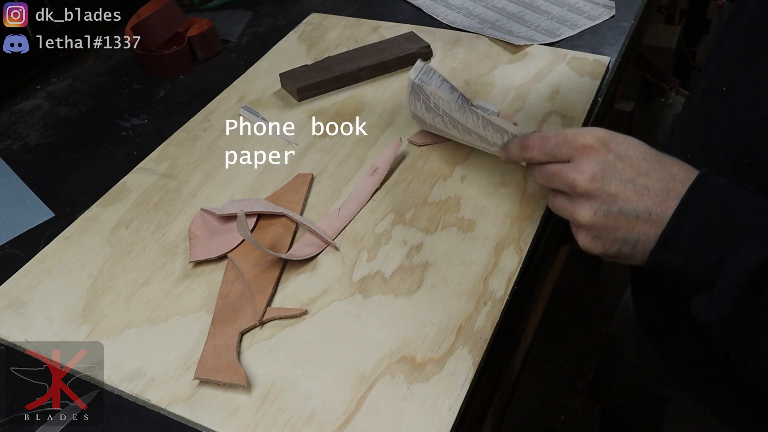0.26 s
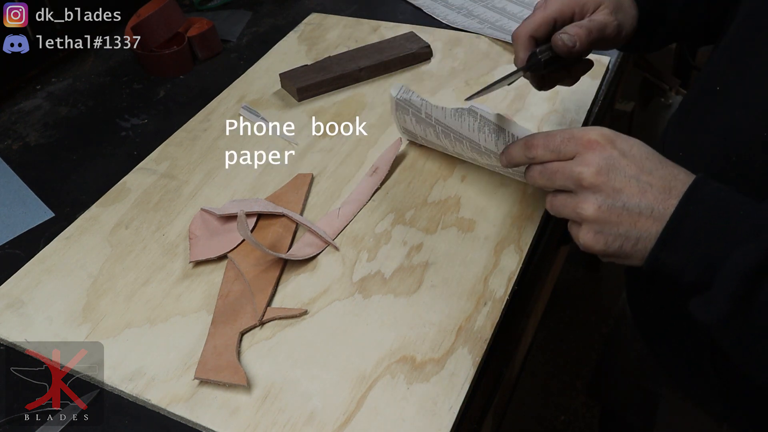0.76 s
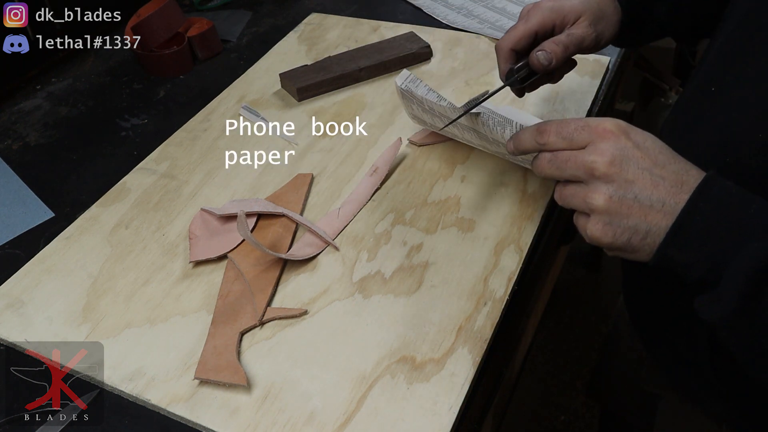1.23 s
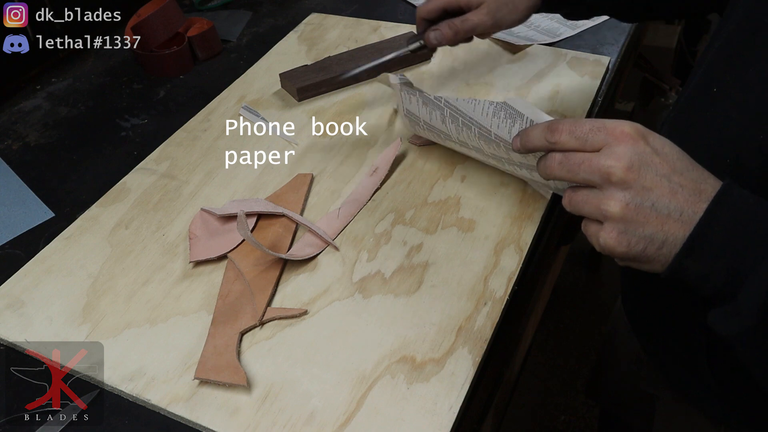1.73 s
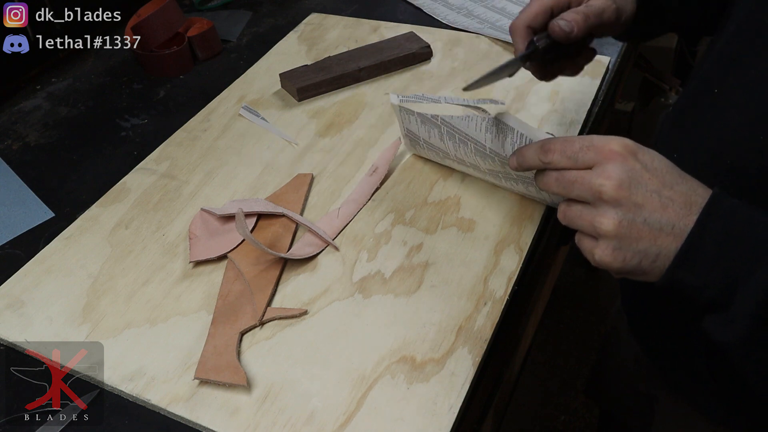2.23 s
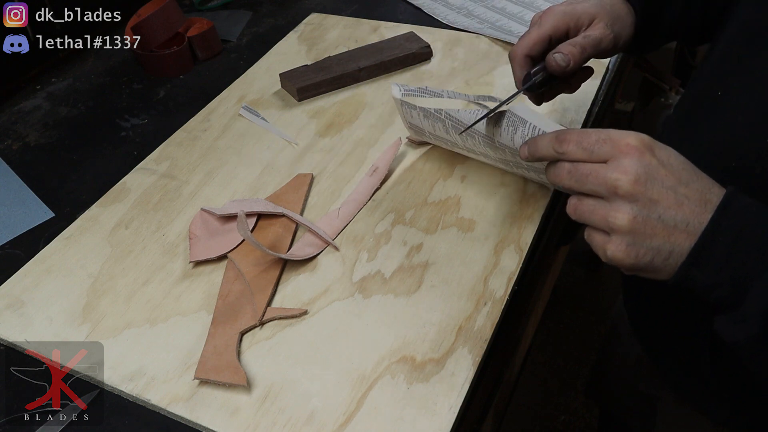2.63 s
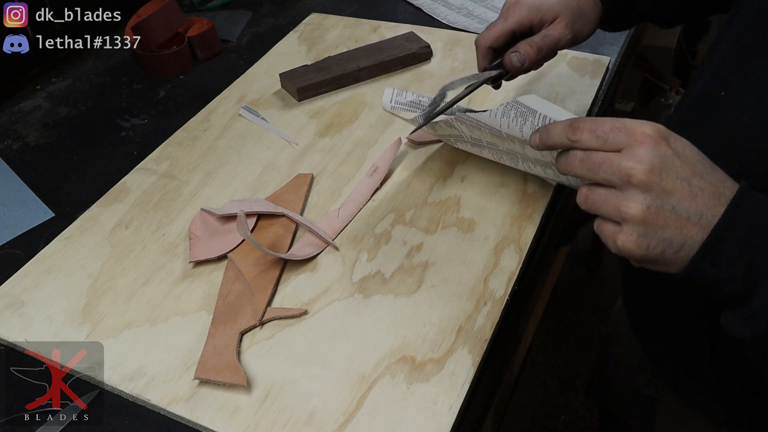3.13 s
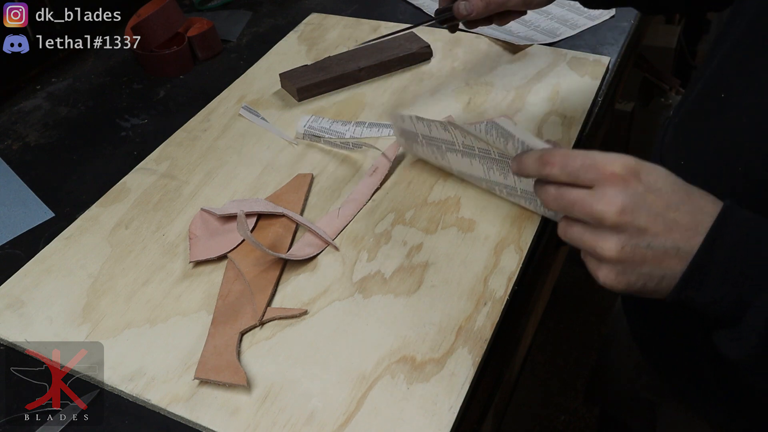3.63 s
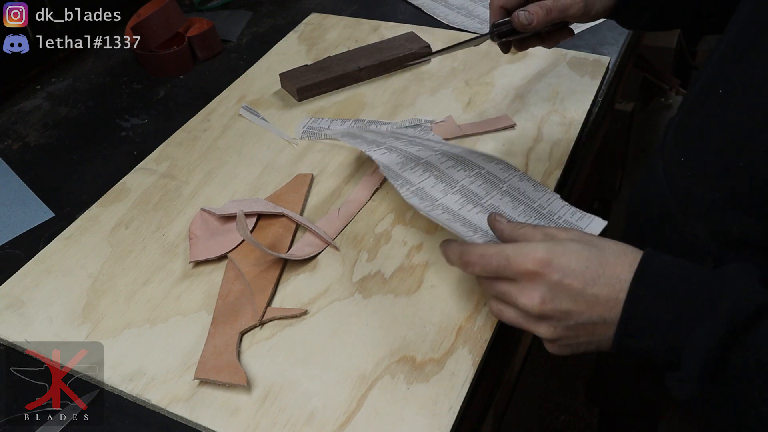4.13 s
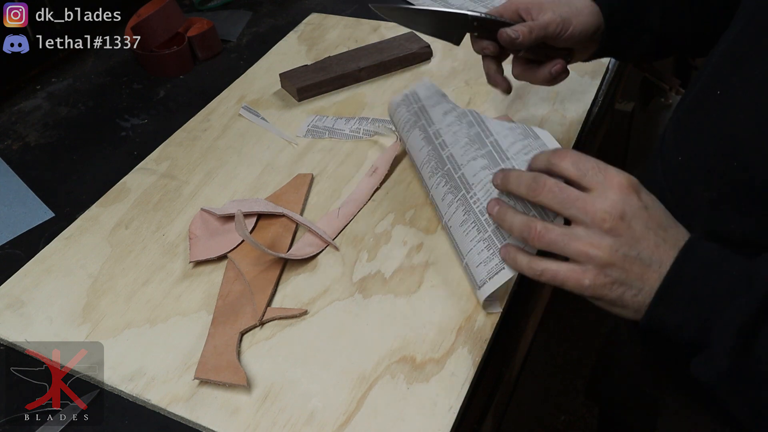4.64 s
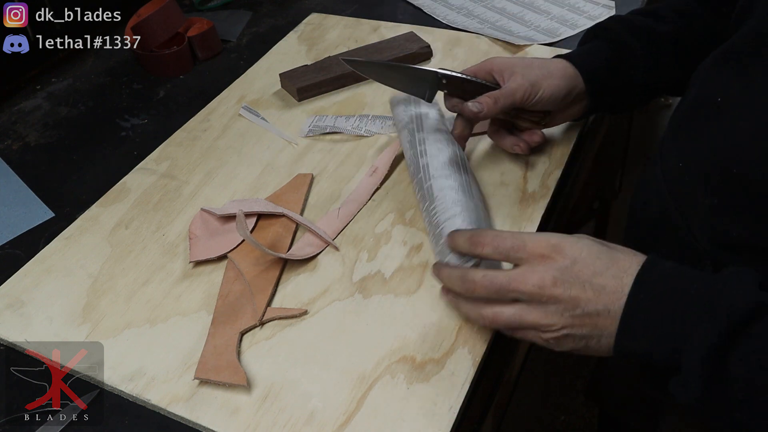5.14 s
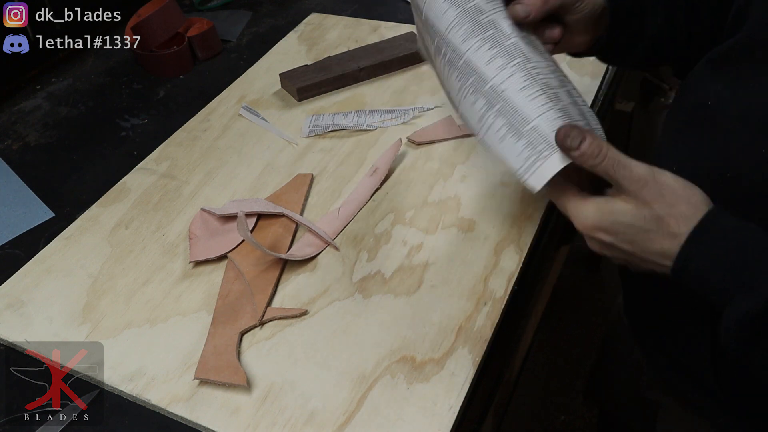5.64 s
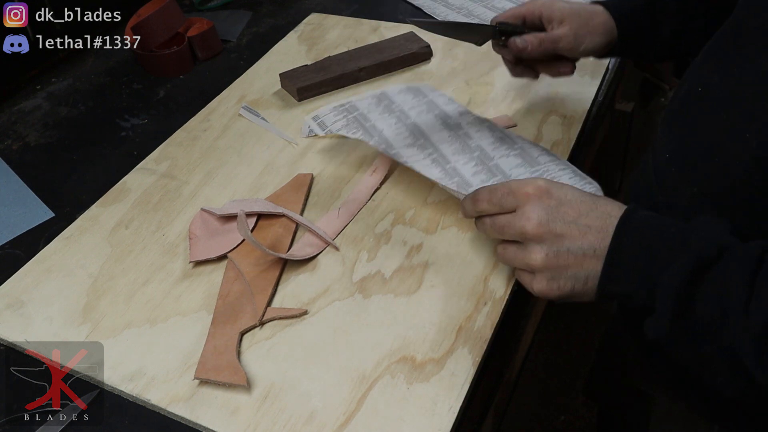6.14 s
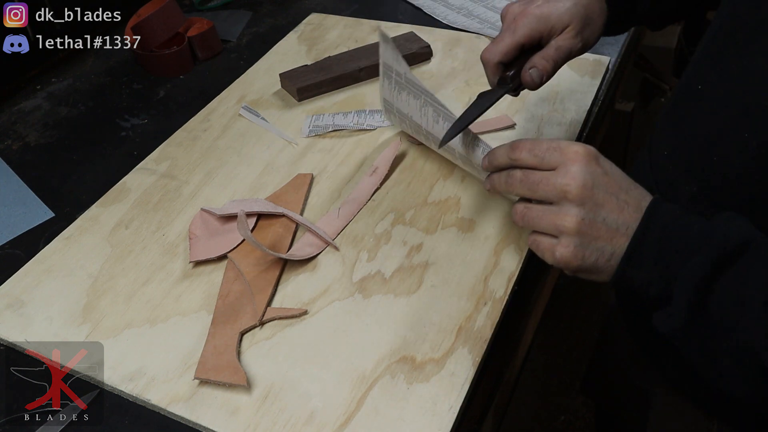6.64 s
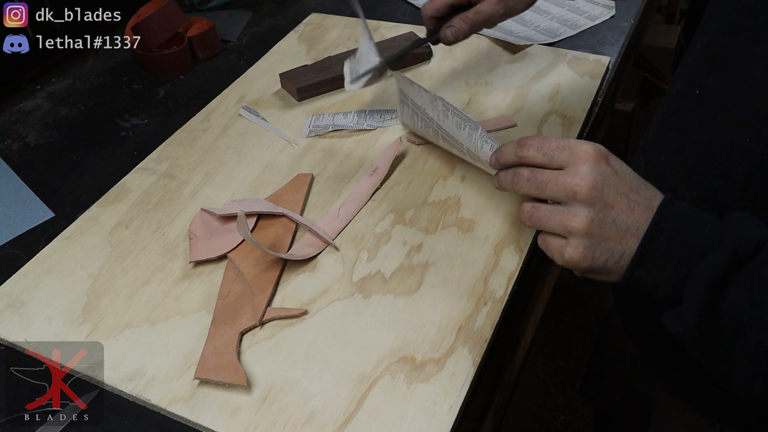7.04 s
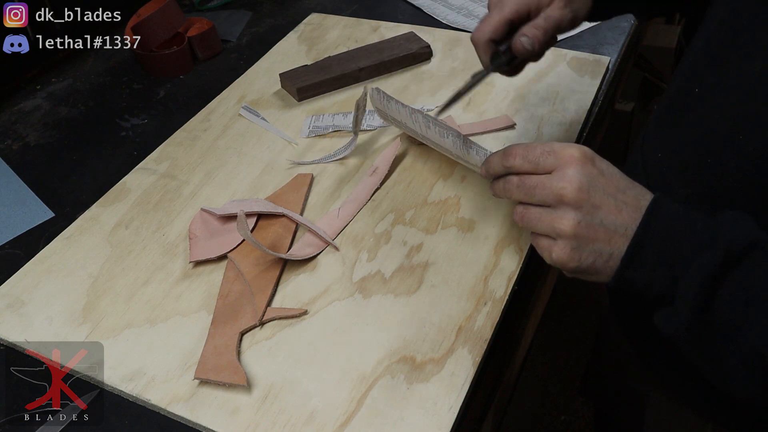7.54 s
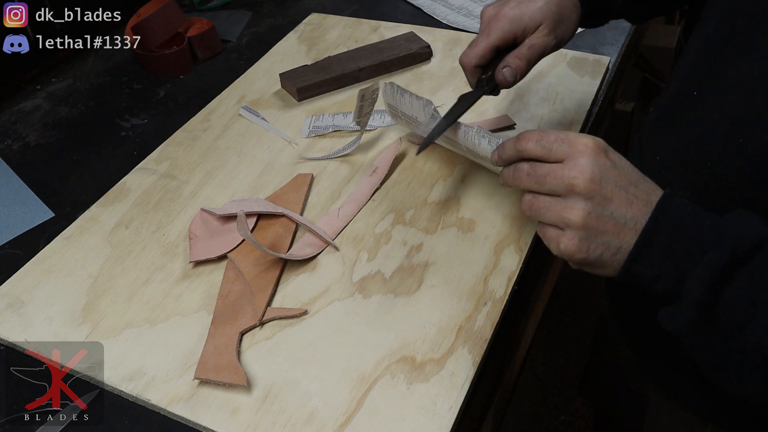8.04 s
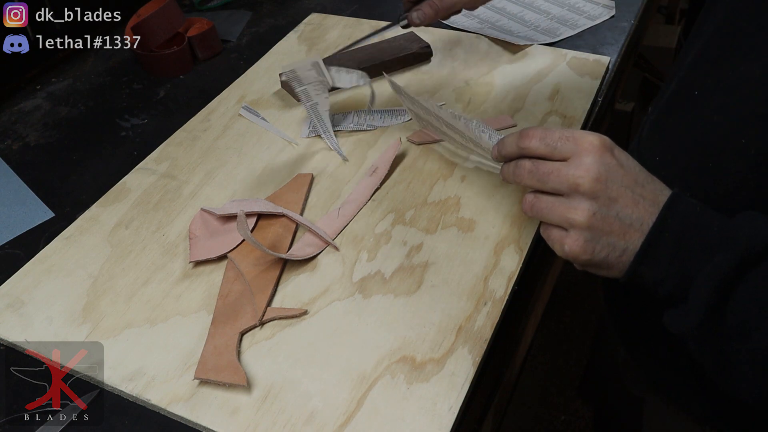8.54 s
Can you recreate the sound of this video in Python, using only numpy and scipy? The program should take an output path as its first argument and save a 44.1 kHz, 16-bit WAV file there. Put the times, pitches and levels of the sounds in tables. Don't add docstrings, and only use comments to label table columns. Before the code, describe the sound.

A knife slices thin paper in five crisp ripping strokes, with rustling, crackling and snapping of the handled sheet between cuts in a quiet workshop.

```python
import sys
import numpy as np
from scipy import signal
from scipy.fft import rfft, irfft
from scipy.io import wavfile
from scipy.ndimage import uniform_filter1d, map_coordinates

SR = 44100
rng = np.random.default_rng(int(sys.argv[2]) if len(sys.argv) > 2 else 0)


def transcribe(u):
    v = np.clip(np.atleast_2d(u).T, -1, 1)
    q = np.round(v * 32767).astype(np.int16)
    wavfile.write(sys.argv[1], SR, q)


def natural_amplitude(level_db):
    exponent = np.asarray(level_db, float) / 20
    return 10 ** exponent


N = 387198

# [f/Hz, level/dB]
AIR = [(24, -28.5), (40, -13.5), (66, -5.5), (153, -10), (466, -14), (765, -15), (845, -12.5), (1730, -27),
       (3470, -23.5), (4230, -31.5), (5430, -25), (7680, -38), (11100, -36), (15000, -57.5)]
# [t/s, level/dB]
HUSH = [
    (0, 1),
    (5.5, 0),
    (6.6, -2.5),
    (7.8, -1),
    (8.78, -0.5),
]
# [t/s, drone level/dB, road rumble level/dB]
TRAFFIC = [(0.0, -79, -90), (1.25, -78, -84), (1.51, -79, -78), (2.59, -67, -79.5), (3.15, -78, -71),
           (3.94, -70, -78), (4.28, -73, -73), (4.65, -64.5, -72), (5.3, -72.5, -72), (5.62, -95, -70.5),
           (5.99, -88, -75), (8.46, -82, -79.5), (8.78, -80, -81)]
# [f/Hz, level/dB, centre t/s, span/s]
ENGINE = [(110, -13, 4.7, 0.82), (129, -10, 4.52, 0.36), (159, -15, 3.9, 0.6), (332, -15, 3.65, 1.4),
          (58, -8.5, 0.55, .3)]
# [f/Hz, t60/s]
ROOM = [(200, 0.58), (1000, 0.53), (4000, 0.28), (12000, 0.2)]

# [f/Hz, width/Hz, lift/dB]
SHEET = [(366, 50, 2), (885, 220, 3.5), (1300, 100, -1), (2200, 550, 5.5), (3550, 510, 6),
         (5450, 1700, 10.5)]
# [f/Hz, level/dB per Hz]
RUSTLE = [(180, -58), (300, -12.5), (404, -10), (663, -7.5), (835, -2.5), (1120, -6), (3450, -7),
          (5660, -17), (15500, -20)]
# [f/Hz, level/dB per Hz]
TEAR = [(76, -50.5), (130, -21.5), (242, -21.5), (361, -10), (497, -12.5), (712, -2.5), (787, -8),
        (852, -1), (1620, -10), (3600, -6), (4570, -6), (5480, -8), (7390, -17), (15500, -22)]

# [t/s, level/dB]
ROAD_HUM = [(0.2, -76), (0.57, -69.5), (1.0, -80), (1.9, -71), (2.4, -72.5), (3.55, -66), (4.3, -69.5),
            (4.78, -68), (5.2, -75.5), (5.755, -64), (5.79, -57), (6.12, -70), (6.4, -66.5), (6.75, -89),
            (7.5, -81), (8.78, -77.5)]
# [fullest t/s, level/dB, swell/s, fade/s, slack/dB]; swell and fade span 20 dB
HAND_MOVES = [(0.3, -67.5, 0.19, 1, -4.5), (0.53, -63.5, 0.043, 0.078, 2), (0.9, -78, 0.055, 0.26, 0),
              (1.82, -63, 0.035, 0.074, -21), (2.198, -66, 1, 0.21, -6), (2.35, -60.5, 0.016, 0.016, -7),
              (3.43, -60.5, 0.045, 0.086, -21), (3.93, -63.5, 0.68, 0.19, -0.5),
              (4.1, -60, 0.051, 0.55, -1), (4.35, -65.5, 0.048, 0.063, -7), (4.47, -71, 0.48, 0.41, -12),
              (4.7, -58.5, 0.048, 0.15, -0.5), (4.82, -58, 0.026, 0.021, 5), (4.96, -65, 0.27, 0.23, 2),
              (5.26, -56.5, 0.056, 0.42, -3.5), (5.45, -62, 0.28, 0.25, 4.5),
              (5.62, -55.5, 0.27, 0.05, -11), (5.85, -60, 0.039, 0.038, 4),
              (5.94, -51.5, 0.048, 0.14, -2.5), (6.09, -72.5, 0.016, 0.12, 13.5),
              (6.33, -60, 0.13, 0.091, 4), (7.2, -56.5, 0.035, 0.11, -11), (7.458, -63.5, 0.084, 0.095, -5),
              (7.564, -71.5, 0.0092, 0.11, -13)]
# [fullest t/s, level/dB, swell/s, fade/s, slack/dB]
SLIDES = [(0.583, -68, 0.036, .04, -3), (0.614, -56.5, 0.048, 0.035, -9), (0.642, -68, .03, 0.056, -4),
          (0.725, -64.5, 0.061, 0.064, -5), (3.69, -75, 0.081, 0.079, -18), (4.025, -61.5, 0.064, 0.08, -5),
          (4.12, -67.5, 0.05, 0.058, 3), (4.456, -60.5, 0.037, 0.031, -1), (4.545, -62.5, 0.052, 0.083, -9),
          (4.735, -65, .05, 0.35, -9), (5.175, -69, 0.024, 0.057, 3), (5.535, -70, 0.0074, 0.01, 5),
          (5.69, -68, 0.013, 0.028, 14), (5.79, -68, 0.014, 0.18, 16), (6.52, -66, 0.27, 0.16, -3),
          (6.641, -73.5, .012, 0.034, 1.5), (6.73, -75, 0.076, 0.29, -5), (7.65, -70, 0.073, 0.082, -6),
          (8.69, -68.5, 0.3, 0.34, -8), (8.693, -71, 0.022, 0.034, 4)]
# [t/s, depth/dB, half length/s]
RESTS = [(2.3, 9, 0.032), (2.43, 10, 0.045), (3.605, 7, .008), (3.652, 8, 0.0092), (3.72, 5, 0.0076),
         (4.053, 13, 0.0087), (4.296, 6, .015), (4.926, 9, 0.01), (5.041, 11, 0.017), (5.144, 20, 0.019),
         (5.752, 13, 0.02), (6.255, 10, 0.0071), (6.612, 11, 0.024)]
# [t/s, peak level/dB, slack/dB, rise/s]
CREASES = [(3.826, -45.5, -9.5, 0.0031), (3.9144, -46.5, -10, 0.01), (4.08, -49.5, 0, 0.0093),
           (4.128, -50.5, 0.5, 0.02), (4.323, -40.5, -6.5, 0.012), (4.58, -44.5, -4.5, 0.0046),
           (4.633, -53.5, 2.5, 0.0065), (4.799, -39, -7.5, 0.015), (4.941, -50.5, 0, 0.0096),
           (5.05, -54.5, -1, 0.0045), (5.298, -40, -3, 0.0087), (5.4056, -47, -4, 0.0066),
           (5.44, -42, -7, 0.013), (5.4755, -37, -3, 0.0052), (5.548, -47, 6.5, 0.0026),
           (5.614, -44, -10, 0.0074), (5.7786, -45.5, 1, 0.0024), (5.806, -44, -10, 0.0048),
           (5.84, -34.5, -16, 0.011), (5.924, -38, -10, 0.018), (6.0228, -41.5, -7, 0.0057),
           (6.079, -38.5, -14, 0.0035), (6.31, -42.5, -7, 0.019), (7.211, -37.5, -19, 0.0023)]
# [t/s, peak level/dB, slack/dB]
FOLDS = [(0.468, -48.5, 1), (0.5227, -40.5, -5), (0.6112, -46, 0), (1.853, -47, -3), (2.1341, -58, 4),
         (2.2024, -48.5, 6.5), (2.334, -44, -2), (2.507, -58, 4.5), (3.615, -50.5, 2), (3.8915, -43, 0),
         (3.9073, -48, -2), (4.333, -32.5, -6), (4.3482, -30, -5), (4.385, -43.5, 5.5), (4.5795, -37.5, 5),
         (4.602, -44.5, 8.5), (5.302, -40.5, 7), (5.354, -46, 7), (5.5481, -28, -4), (5.7795, -42, 2),
         (5.8077, -36.5, -2), (5.902, -40, -9), (5.9152, -35, -7), (6.053, -49, 6), (6.0832, -50, -4),
         (6.2304, -53, 8), (6.309, -41, 3), (6.2945, -47, 6), (6.332, -51, 1), (5.712, -58.5, 20),
         (5.765, -58, 12), (4.455, -51.5, 6), (7.566, -48, -9), (7.615, -50.5, -4)]
# [t/s, peak level/dB]
CRACKLES = [(0.585, -51), (0.6161, -52), (0.635, -53), (0.727, -56.5), (3.9288, -47), (3.9496, -46),
            (3.9659, -49), (4.112, -45), (4.1863, -51), (4.735, -48), (4.8246, -36), (5.249, -46),
            (5.3646, -45), (5.4074, -40), (5.4423, -42), (5.535, -43), (5.8514, -40), (5.9314, -44),
            (6.1198, -61), (6.384, -46)]

# [t/s, level/dB]
JERKS = [
    (.076, -3.5),
    (7.055, -11.5),
    (8.365, -17),
]
# [f/Hz, level/dB, t60/s]
KNOCK = [
    (138, -55.5, 0.066),
    (382, -38, 0.08),
    (978, -40.5, 0.2),
]
# [t/s, peak level/dB, rise/s, crispness/dB]
CATCHES = [(0.075, -19.5, 0.0027, -8.5), (1.0796, -38.5, 0.0071, 17.5), (1.705, -36.5, 0.008, 9),
           (3.023, -25, 0.011, -13), (3.378, -39, 0.0042, 11), (7.0713, -23, 0.0092, 0),
           (7.114, -22, 0.002, -1), (7.137, -26, 0.0048, -16), (8.025, -36.5, 0.003, 5),
           (8.0557, -33, 0.0083, 2.5), (8.1599, -34, 0.0037, 10), (8.372, -32, 0.011, 2)]
# [t/s, peak level/dB]
FIBRE_SNAPS = [(0.0777, -20.5), (1.0174, -44), (1.0645, -35), (1.0806, -39), (1.123, -46), (1.159, -37),
               (1.1927, -33), (1.328, -36), (2.59, -33), (2.604, -34), (2.664, -35), (2.823, -31),
               (3.083, -31), (3.2004, -29), (3.2169, -32), (3.233, -27), (3.244, -27.5), (7.994, -31.5),
               (8.026, -30), (8.0582, -30), (8.1608, -28), (8.2817, -28), (8.3696, -30), (8.375, -28),
               (8.3859, -28)]
# [t/s, peak level/dB]
MORE_FIBRE_SNAPS = [(1.03, -36), (1.0979, -34), (1.1506, -39), (1.2312, -41), (1.4164, -40), (1.4295, -36),
                    (1.499, -37), (1.5284, -40), (1.459, -38), (1.5673, -31), (2.569, -37), (2.6281, -39),
                    (2.6337, -35), (3.057, -31), (3.0712, -34), (3.1696, -37), (2.686, -38), (2.7012, -30),
                    (2.7502, -36), (2.761, -36), (2.9227, -30.5), (2.968, -37), (2.9902, -28.5), (3.1082, -38),
                    (3.1628, -35), (3.183, -35), (3.19, -27.5), (3.25, -31), (3.266, -35), (3.276, -31),
                    (3.2835, -38), (3.383, -25.5), (6.8265, -27), (6.853, -32), (6.9272, -37), (6.956, -30),
                    (7.0053, -26), (7.023, -37), (7.1192, -35), (7.139, -29), (7.9541, -36), (8.0339, -33),
                    (8.078, -31), (8.0866, -30), (8.1, -35), (8.1853, -25), (8.247, -24.5), (8.309, -30),
                    (8.326, -26), (8.2086, -25.5), (8.3932, -27.5), (8.436, -38), (8.4619, -38), (8.4925, -34),
                    (8.5243, -32), (8.538, -32)]
# [t/s, depth/dB, half length/s]
STALLS = [(2.773, 4, 0.024), (2.975, 7, 0.022), (8.013, 6, 0.011), (8.047, 5, 0.0062), (8.112, 7.5, 0.01),
          (8.152, 5, 0.0061), (8.361, 7, 0.0054), (1.03, -3.5, .008), (1.07, 6, 0.0066), (1.69, 4, 0.0095),
          (6.85, -3, 0.0074), (6.882, 2.5, 0.013), (7.157, 2.5, 0.006), (8.2, 1, .006), (8.305, 3.5, 0.015)]

# [t/s, tearing level/dB, slack of the free sheet/dB, crispness of the tear/dB]
CUT_1 = [(0.0, -42.5, -4.5, -10), (0.062, -41, -13.5, -15), (0.074, -44.5, 0, -7.5),
         (0.076, -31, -13.5, -7.5), (0.121, -45, -3.5, -1.5), (0.14, -64, 5.5, -7.5)]
CUT_2 = [(1.008, -63, -1, 1), (1.09, -52, -5, -1), (1.25, -59, 1.5, -2.5), (1.4, -56, -1.5, -5.5),
         (1.428, -49, -2, -4.5), (1.524, -49, -3, -7.5), (1.64, -47.5, -6.5, -5.5), (1.727, -45.5, -4, 1.5),
         (1.775, -70.5, 7.5, -14)]
CUT_3 = [(2.542, -64.5, 6, -2), (2.642, -53, -7.5, 2), (2.766, -55, -1.5, -7.5), (3.014, -43.5, -5.5, -5),
         (3.132, -51, -6.5, -6), (3.216, -46.5, -4.5, -5.5), (3.33, -43, -7.5, -7),
         (3.394, -45.5, -4, -3.5), (3.401, -57, 6, -6)]
CUT_4 = [(6.8, -51, 1, -2.5), (6.834, -43, -4.5, -5), (6.91, -45, -11.5, -13), (7.03, -44, 0.5, -7.5),
         (7.09, -46.5, -1.5, -9), (7.168, -45, -9, 0.5), (7.19, -67, 15, -14.5)]
CUT_5 = [(7.876, -62.5, 5, -2.5), (7.901, -49.5, -7, -5.5), (7.959, -56.5, 0, -0.5),
         (8.17, -42.5, -4, -8.5), (8.289, -45, -4, -3), (8.395, -47.5, -3, -3.5), (8.423, -52.5, -4.5, -5),
         (8.539, -46, -9, -3), (8.565, -67.5, 10, -17)]
# [t/s, low f/Hz, lift/dB, middle f/Hz, lift/dB, upper f/Hz, lift/dB]
RINGS_1 = [(0.0, 2400, 5, 3440, 5.5, 5400, 5), (0.076, 2500, 6, 3320, 11, 5540, 10),
           (0.14, 2400, 4.5, 3600, 0, 5500, 6)]
RINGS_2 = [(1.02, 2060, 10.5, 3580, 7.9, 5100, 7.4), (1.123, 2200, 9.8, 3650, 8.4, 5290.0, 2.4),
           (1.226, 2090, 11.2, 3550.0, 6.4, 5400.0, 8.4), (1.329, 2120, 6, 3600.0, 7.3, 5290.0, 3.5),
           (1.431, 2160, 9.5, 3600.0, 10.6, 5200, 2.5), (1.534, 2070, 13.4, 3430, 5.4, 5140, 6.4),
           (1.637, 2120, 9.1, 3580, 6.2, 4960, 7.1), (1.74, 2290.0, 1.8, 3850, 8.7, 5170.0, 9.8)]
RINGS_3 = [(2.56, 2120, 10, 3730, 8.8, 5400, 7), (2.664, 2100, 13.3, 3670.0, 5.9, 5830, 6.1),
           (2.768, 2100, 11.7, 3920, 9.3, 5900, 13), (2.871, 2220, 7.4, 3720, 3.5, 5300, 6.6),
           (2.975, 2350, 10.3, 3830, 3.7, 5260, 11.6), (3.079, 2370, 5.9, 3530.0, 11, 5230.0, 6.8),
           (3.182, 2380, 4.1, 3420, 9.4, 5000, 11.8), (3.286, 2390, 7, 3500, 8.7, 5130, 10.3),
           (3.39, 2350, 8.5, 3400, 7.3, 5340, 6.7)]
RINGS_4 = [(6.81, 2460.0, 7.5, 3720, 5.7, 5560, 9.2), (6.882, 2560.0, 5.8, 3470, 11.5, 5340, 2.9),
           (6.954, 2430, 5.2, 3630, 13.5, 5230, 7.4), (7.026, 2300, 6.8, 3580, 9.7, 5540, 7.6),
           (7.098, 2450, 3.1, 3940, 10.3, 5230, 5.9), (7.17, 2340, 7.4, 3750, 7.4, 5350, 6.5)]
RINGS_5 = [(7.89, 2290.0, 8.7, 3630.0, 1.0, 5180.0, 11), (7.983, 2290, 10, 3670.0, 3.9, 5460.0, 11),
           (8.076, 2400.0, 6.1, 3470, 4.8, 5450, 4.6), (8.169, 2410, 5.2, 3470, 8.1, 5400, 6.4),
           (8.261, 2520, 5.4, 3660.0, 8.5, 5400.0, 7.8), (8.354, 2450.0, 2.9, 3620.0, 11.5, 5260, 9.4),
           (8.447, 2240, 8.3, 3700, 7.6, 5120.0, 4), (8.54, 2440, 5.5, 3700, 5.8, 5530, 8)]

BODY_HZ, FLAP_HZ, EDGE_HZ = 1520, 2750, 7650


def unit(x):
    return x / np.sqrt(np.mean(x ** 2) + 1e-20)


def along(points, hz):
    f, v = np.transpose(points)
    return np.interp(np.log(hz + 1), np.log(f + 1), v)


def curves(tables):
    t = np.arange(N) / SR
    out = np.zeros((len(tables[0][0]) - 1, N))
    out[0] = -200
    for rows in tables:
        s, *cols = np.transpose(rows)
        inside = (t >= s[0]) & (t <= s[-1])
        out[:, inside] = [np.interp(t[inside], s, c) for c in cols]
    return out


def wobble(rate):
    knots = rng.standard_normal(int(N * rate / SR) + 4)
    return map_coordinates(knots, [np.arange(N) * rate / SR])


def dips(rows):
    t = np.arange(N) / SR
    return sum(db * np.exp(-((t - s) / half) ** 2) for s, db, half in rows)


def coloured(x, gain):
    m = 2 ** 14
    cepstrum = irfft(np.log(gain(np.fft.rfftfreq(m, 1 / SR)) + 1e-6), m)
    cepstrum[1:m // 2] *= 2
    cepstrum[m // 2 + 1:] = 0
    response = irfft(np.exp(rfft(cepstrum)), m)
    return signal.fftconvolve(x, response)[:len(x)]


def air():
    hush = coloured(rng.standard_normal(N), lambda f: natural_amplitude(along(AIR, f)))
    return natural_amplitude(-74.5 + curves([HUSH])[0] + 0.61 * wobble(1.28)) * unit(hush)


def unsteady_tone(hz, rough):
    phase = 2 * np.pi * np.cumsum(hz * (1 + rough * wobble(5.9))) / SR
    return np.sqrt(2) * np.sin(phase)


def traffic():
    t = np.arange(N) / SR
    drone_db, road_db = curves([TRAFFIC])
    out = natural_amplitude(drone_db + 1.1 * wobble(2.6)) * unsteady_tone(49.5, rough=0.015)
    for hz, db, centre, span in ENGINE:
        swell = np.exp(-((t - centre) / span) ** 2)
        out += natural_amplitude(-67.5 + db + 1.2 * wobble(8.1)) * swell * unsteady_tone(hz, rough=0.0047)
    rumble = lambda f: f ** 4 / (1 + (f / 45) ** 5) / (1 + (f / 260) ** 2)
    road = unit(coloured(rng.standard_normal(N), rumble))
    return out + natural_amplitude(road_db + 1.8 * wobble(1.9)) * road


def room(x):
    out, step = np.zeros(N + SR), SR // 3
    for start in range(0, N, step):
        hz, t, z = signal.stft(rng.standard_normal(SR // 2), SR, nperseg=256)
        decay = natural_amplitude(-60 * t / along(ROOM, hz)[:, None])
        tail = signal.istft(z * decay, SR, nperseg=256)[1]
        wet = signal.fftconvolve(x[start:start + step], tail / np.linalg.norm(tail))
        out[start + 200:][:len(wet)] += wet
    return out[:N]


def zones(x, spectrum, sheet=SHEET):
    def lift(f):
        return 1 + sum((natural_amplitude(db) - 1) / (1 + (2 * (f - c) / w) ** 2) for c, w, db in sheet)

    def under(f, top):
        return 1 / (1 + (f / top) ** 12)

    def zone(low, high):
        share = lambda f: np.sqrt(under(f, high) * (1 - under(f, low)))
        return unit(coloured(x, lambda f: natural_amplitude(along(spectrum, f)) * lift(f) * share(f)))

    limits = (FLAP_HZ, EDGE_HZ), (1, BODY_HZ), (BODY_HZ, FLAP_HZ), (EDGE_HZ, SR)
    return np.array([zone(low, high) for low, high in limits])


def fibres(per_s, spread_db, hiss, clump_db, patchy_db, slow=1):
    chance, size = rng.random(N), rng.exponential(size=N)
    sign = np.sign(rng.standard_normal(N))
    clicks = (chance < per_s / SR) * natural_amplitude(spread_db * np.minimum(size, 3)) * sign
    clumps = natural_amplitude(clump_db * (slow * wobble(35) + 1.05 * wobble(140)))
    x = clumps * (unit(clicks) + hiss * rng.standard_normal(N))
    z = signal.stft(x, nperseg=256)[2]
    patches = uniform_filter1d(rng.standard_normal(z.shape), size=3, axis=0)
    patches = uniform_filter1d(patches, size=18, axis=1)
    return signal.istft(z * natural_amplitude(patchy_db * unit(patches)), nperseg=256)[1][:N]


def crumple(events):
    drive = fibres(per_s=2500, spread_db=2.5, hiss=0.7, clump_db=-0.25, patchy_db=1.25, slow=0.3)
    parts = zones(drive, RUSTLE)
    out, t = np.zeros(N + SR), np.arange(SR // 8) / SR
    for s, db, rise, shares_db in events:
        span = slice(round(s * SR), round(s * SR) + len(t))
        shape = (t / rise * np.exp(1 - t / rise)) ** 1.4
        out[span] += natural_amplitude(db - 12.5) * shape * (natural_amplitude([0, *shares_db]) @ parts[:, span])
    return out[:N]


def snap(events):
    out, length = np.zeros(N + SR), SR // 8
    ring = zones(np.eye(1, length)[0], TEAR)
    ring = ring / np.abs(ring).max(axis=1, keepdims=True)
    for s, db, flap_db, edge_db in events:
        ragged = np.r_[1, 0.45 * rng.standard_normal(90) * natural_amplitude(-np.arange(90) / 5)]
        clean = natural_amplitude([0, flap_db - 11, flap_db, edge_db]) @ ring
        click = np.convolve(clean, ragged)[:length]
        click = click * np.abs(clean).max() / np.abs(click).max()
        out[round(s * SR):][:length] += natural_amplitude(db - 7.0) * click
    return out[:N]


def road_hum():
    centre, width = 893, 180
    resonance = lambda f: f / centre / np.sqrt(1 + (2 * (f - centre) / width) ** 2)
    hum = coloured(rng.standard_normal(N), lambda f: resonance(f) / (1 + (f / 1400) ** 6))
    return natural_amplitude(curves([ROAD_HUM])[0] - 3 + 3.8 * wobble(25)) * unit(hum)


def hands():
    drive = fibres(per_s=500, spread_db=0.5, hiss=1.4, clump_db=1.97, patchy_db=1.94, slow=0.77)
    tear, body, flap, edge = zones(drive, RUSTLE)
    out, t = np.zeros(N), np.arange(N) / SR
    for s, db, swell, fade, slack_db in HAND_MOVES + SLIDES:
        near = slice(max(round((s - 2 * swell) * SR), 0), round((s + 2 * fade) * SR))
        envelope = natural_amplitude(db - 20 * np.maximum((s - t[near]) / swell, (t[near] - s) / fade))
        full = natural_amplitude(slack_db) * (natural_amplitude(-2) * body[near] + natural_amplitude(-1.5) * flap[near])
        crisp = natural_amplitude(-9 - 0.38 * slack_db) * edge[near]
        out[near] += envelope * (tear[near] + full + crisp)
    return natural_amplitude(-4.5 - dips(RESTS)) * out


def creases():
    return crumple([(s, db, rise, (2 + slack, 7 + slack, -23)) for s, db, slack, rise in CREASES])


def folds():
    flips = [(s, db, -1 + slack, -4 - 0.75 * slack) for s, db, slack in FOLDS]
    crackles = [(s, db + 2, 0, -7) for s, db in CRACKLES]
    return snap(flips + crackles)


def thump():
    out = np.zeros(N)
    for s, jerk_db in JERKS:
        t = np.maximum(np.arange(N) / SR - s, 0)
        for hz, db, t60 in KNOCK:
            out += natural_amplitude(jerk_db + db - 60 * t / t60) * np.sin(2 * np.pi * hz * t)
    return out


def catches():
    return crumple([(s, db, rise, (-12.5, -16.5, -7 + crisp)) for s, db, rise, crisp in CATCHES])


def blade_snaps():
    gain_db = 3.5
    first = [(s, db + gain_db, -9, 2.5) for s, db in FIBRE_SNAPS]
    further = [(s, db - 0.5 + gain_db, -9, 2.5) for s, db in MORE_FIBRE_SNAPS]
    return snap(first + further)


def curled(x):
    hz, t, z = signal.stft(x, SR, nperseg=512)
    s, *cols = np.transpose(np.concatenate([RINGS_1, RINGS_2, RINGS_3, RINGS_4, RINGS_5]))
    cols = [np.interp(t, s, c) for c in cols]
    f = hz[:, None]
    lift = 1
    for c, db, width in zip(cols[::2], cols[1::2], (534, 480, 880)):
        lift = lift + (natural_amplitude(db) - 1) * 1j * f * width / (c * c - f * f + 1j * f * width)
    return signal.istft(z * lift, SR, nperseg=512)[1][:N]


def cuts():
    drive = fibres(per_s=1600, spread_db=2.0, hiss=0.9, clump_db=0.92, patchy_db=1.6, slow=0.15)
    level_db, slack_db, crisp_db = curves([CUT_1, CUT_2, CUT_3, CUT_4, CUT_5])
    tear, body, flap, edge = zones(drive, TEAR, sheet=SHEET[:3])
    boom = natural_amplitude(slack_db + 3.0) * body
    flutter = natural_amplitude(0.43 * slack_db - 2.0) * flap
    hiss = natural_amplitude(crisp_db + 4) * edge
    stroke = natural_amplitude(level_db - dips(STALLS)) * (tear + boom + flutter + hiss)
    return curled(natural_amplitude(-4.5) * stroke)


def scene():
    handled = road_hum() + hands() + creases() + folds()
    cut = thump() + catches() + blade_snaps() + cuts()
    sheet = handled + cut
    mono = air() + traffic() + natural_amplitude(-14.0) * room(sheet) + natural_amplitude(-2.0) * sheet
    return np.array([mono, mono])


def low_pass(x):
    return signal.sosfilt(signal.butter(12, 15780, fs=SR, output="sos"), x)


def record(dry):
    return low_pass(dry)


dry = scene()
out = record(dry)
transcribe(out)
```